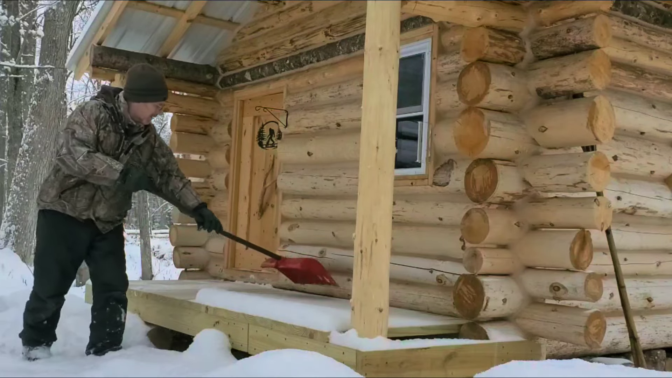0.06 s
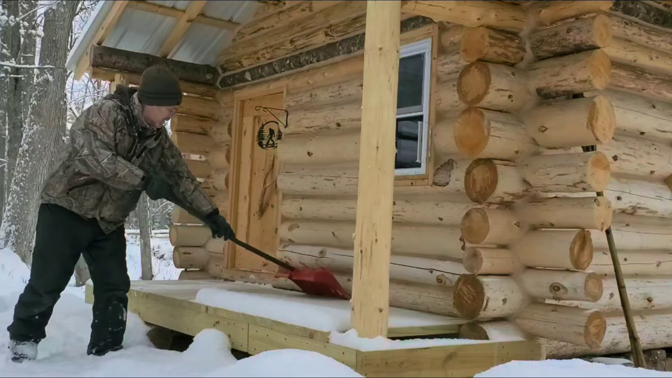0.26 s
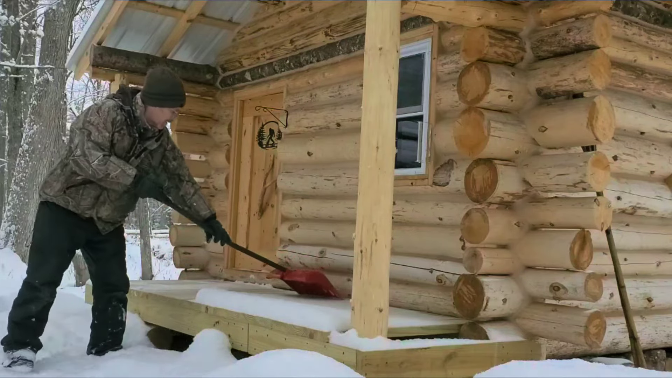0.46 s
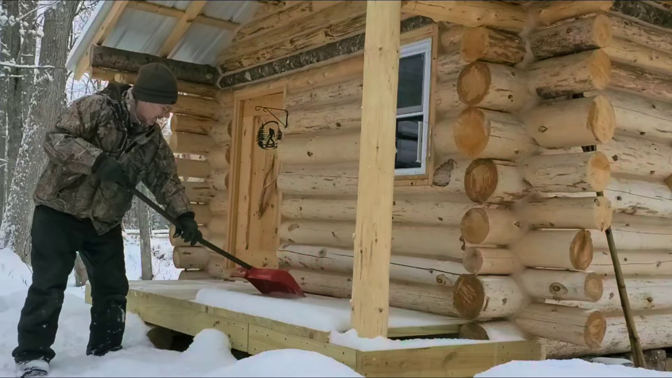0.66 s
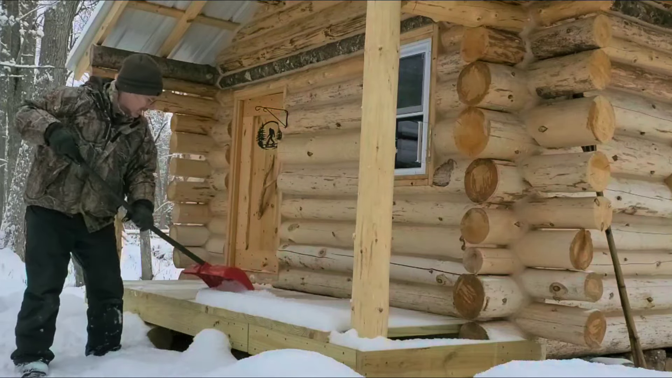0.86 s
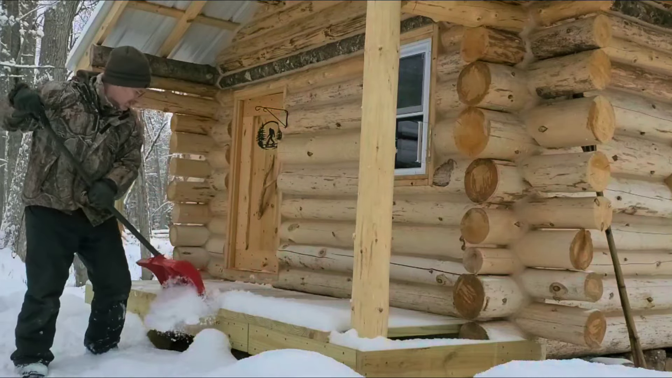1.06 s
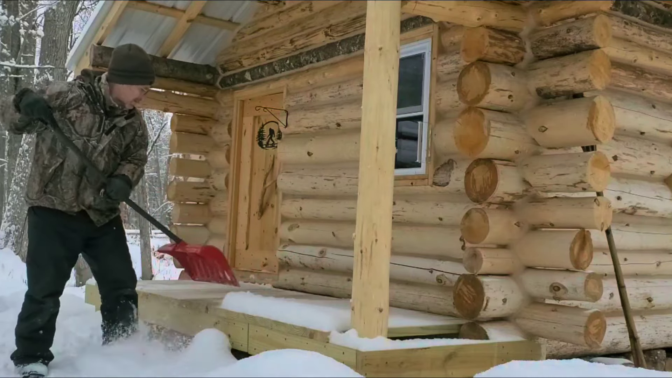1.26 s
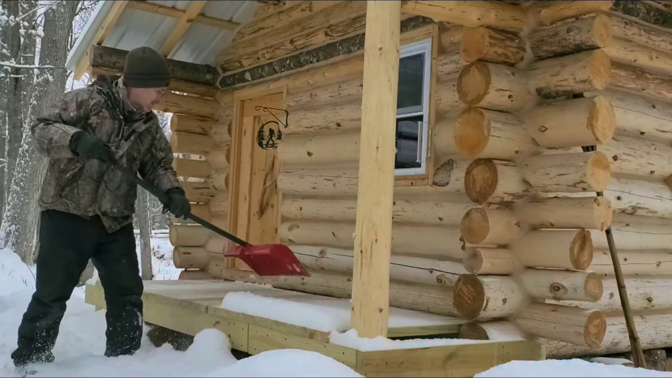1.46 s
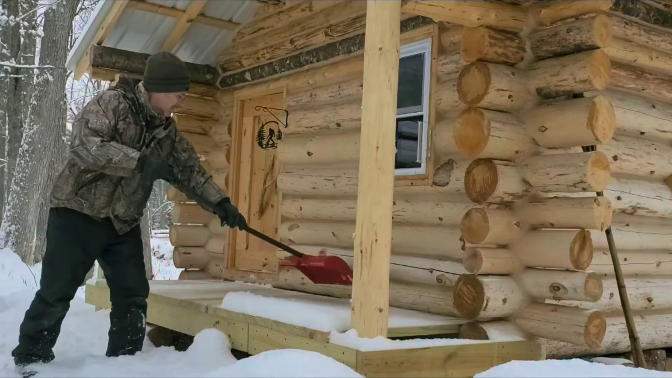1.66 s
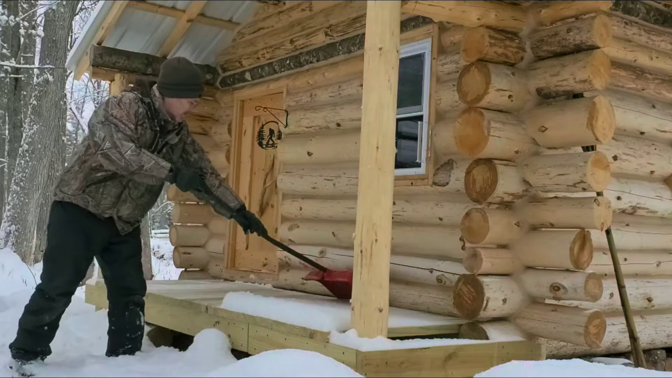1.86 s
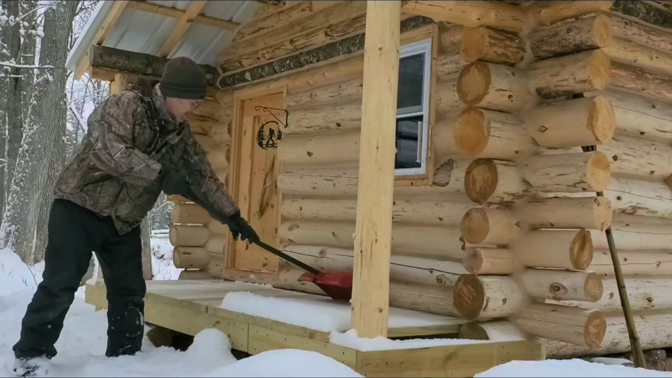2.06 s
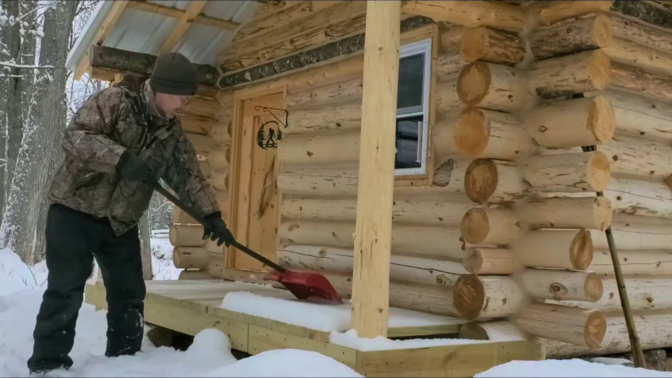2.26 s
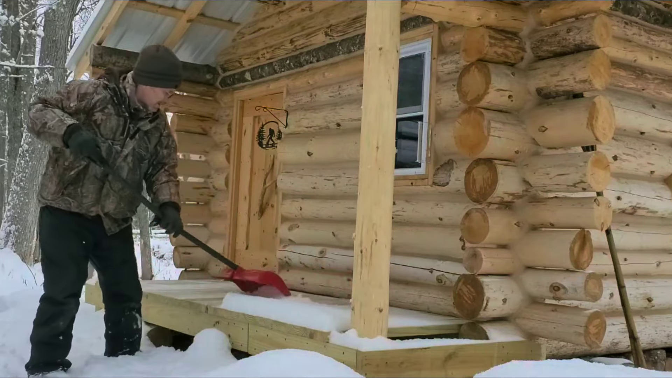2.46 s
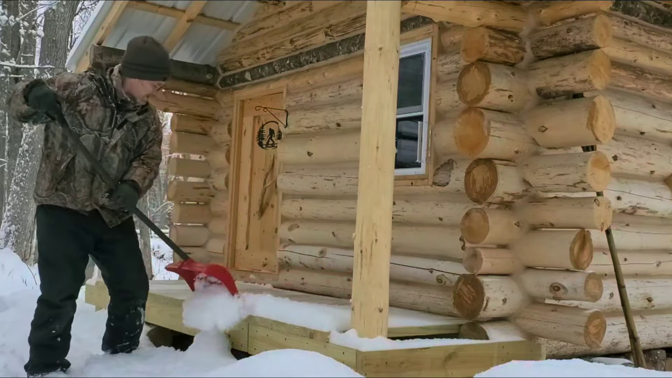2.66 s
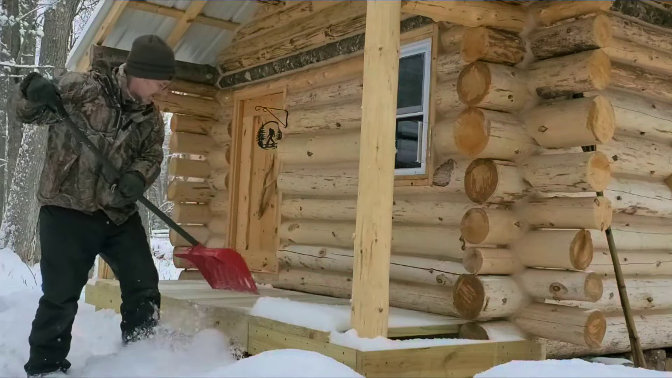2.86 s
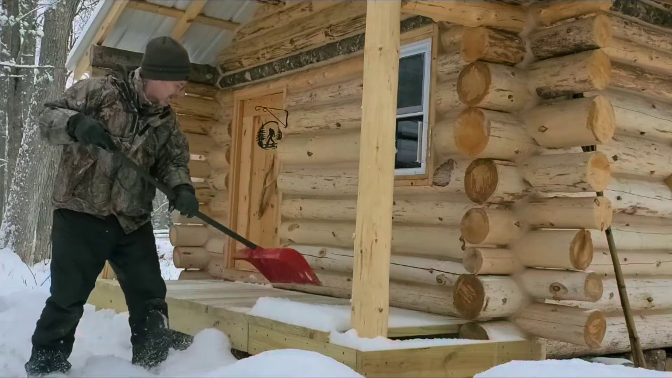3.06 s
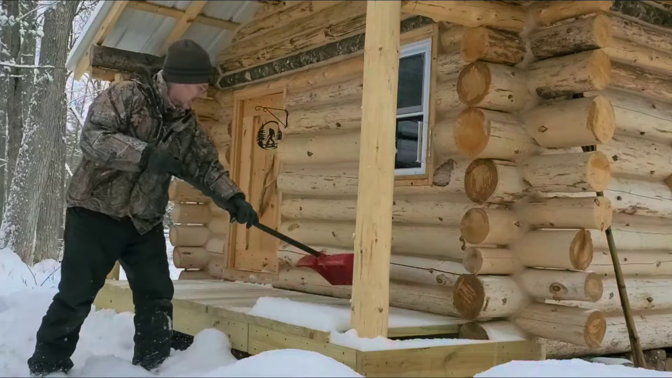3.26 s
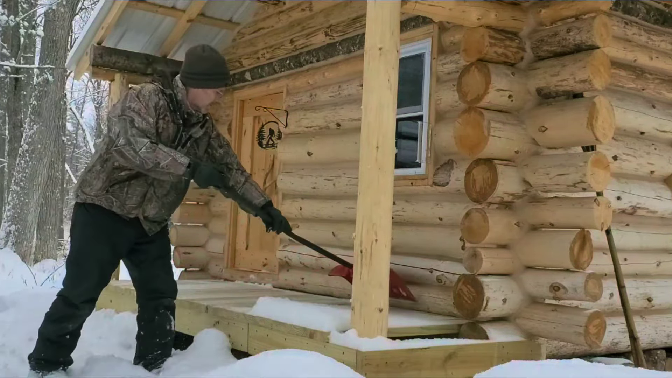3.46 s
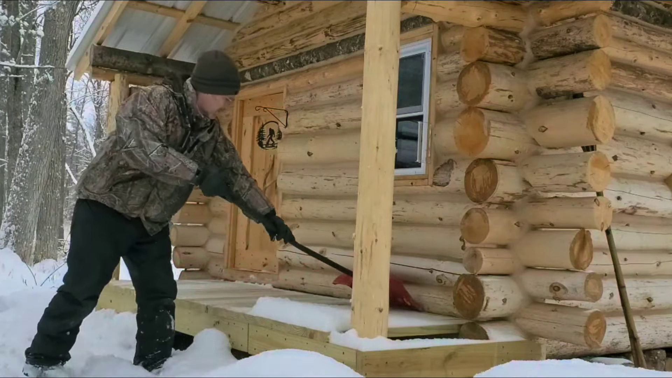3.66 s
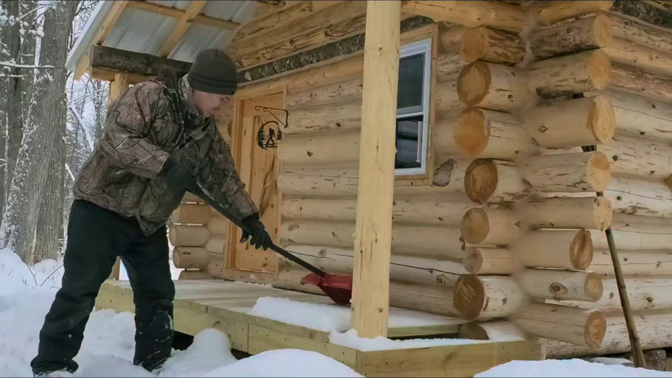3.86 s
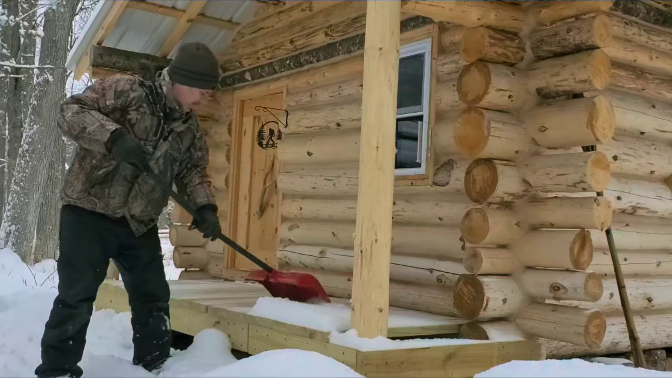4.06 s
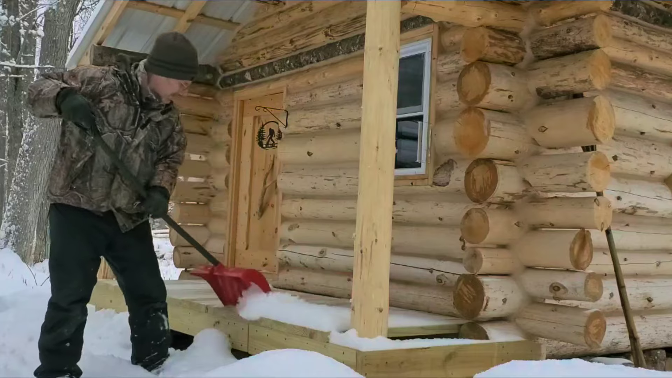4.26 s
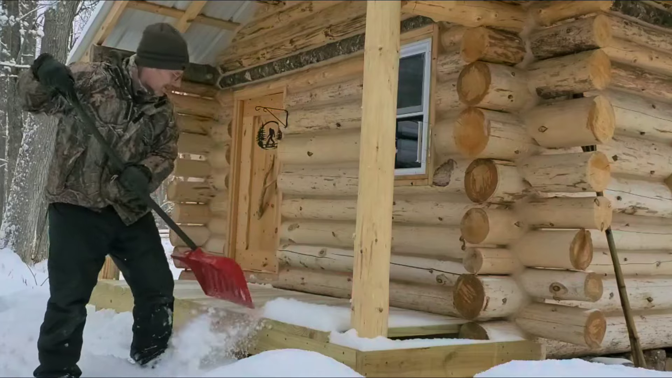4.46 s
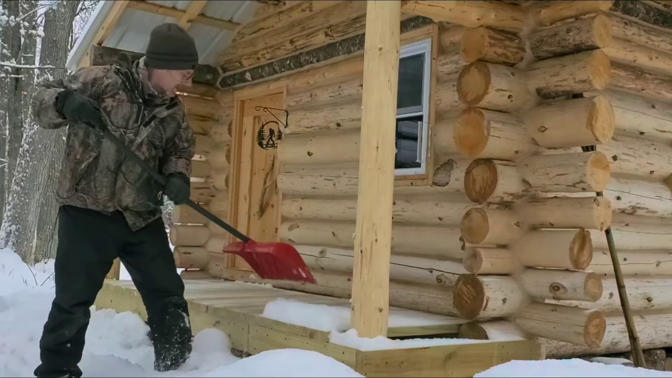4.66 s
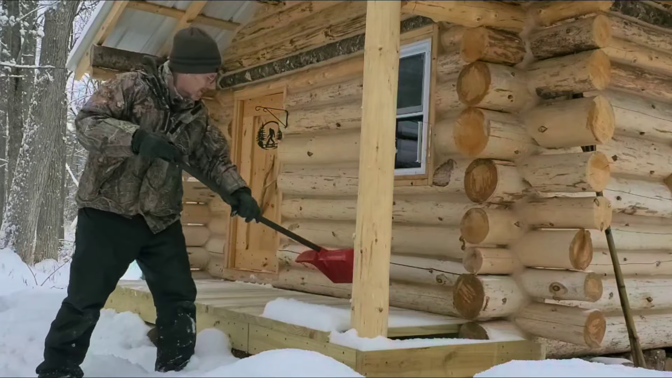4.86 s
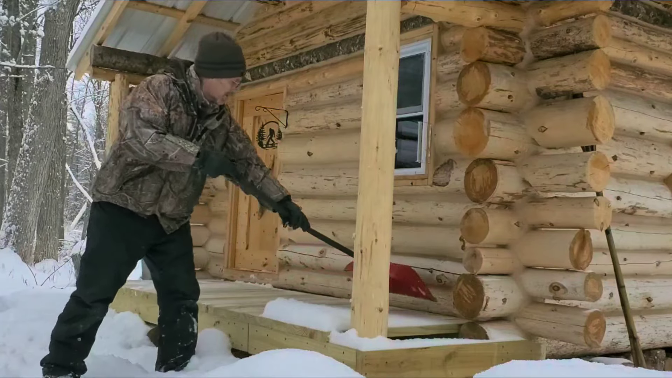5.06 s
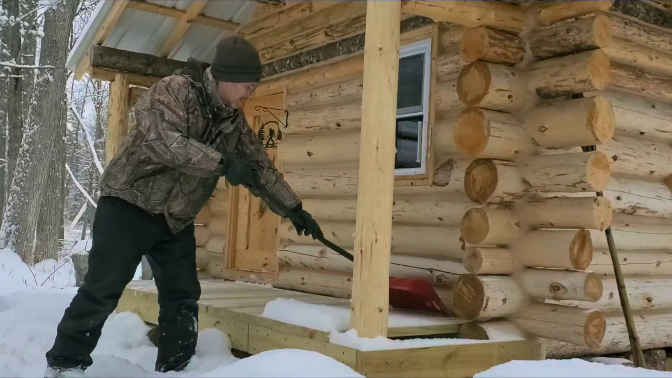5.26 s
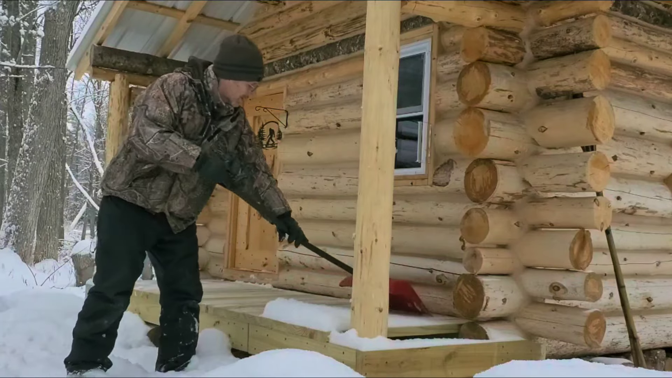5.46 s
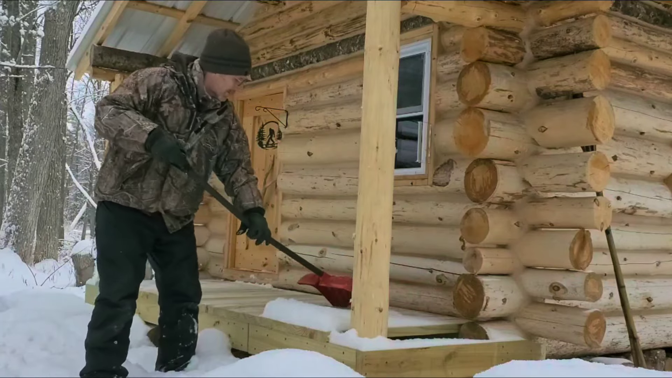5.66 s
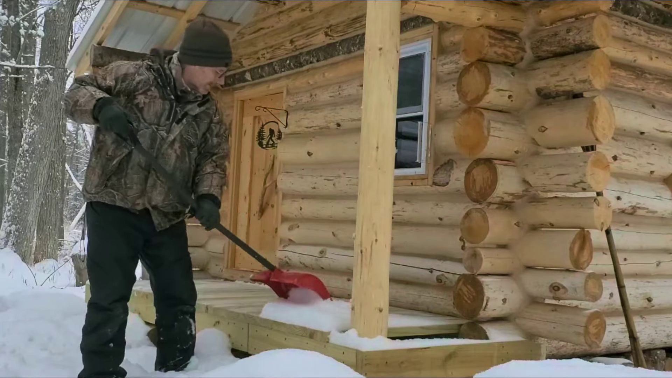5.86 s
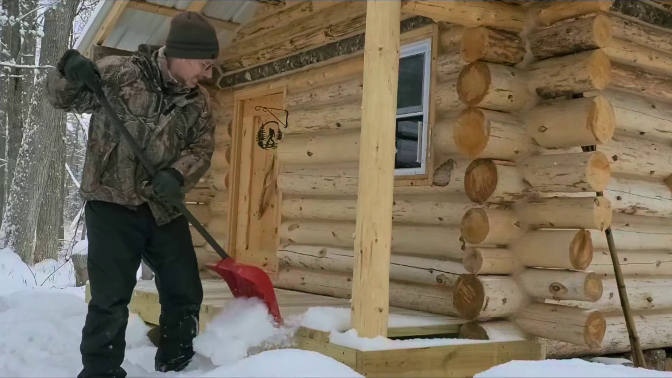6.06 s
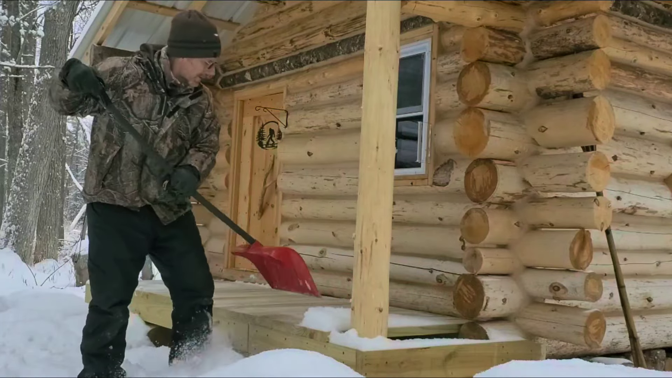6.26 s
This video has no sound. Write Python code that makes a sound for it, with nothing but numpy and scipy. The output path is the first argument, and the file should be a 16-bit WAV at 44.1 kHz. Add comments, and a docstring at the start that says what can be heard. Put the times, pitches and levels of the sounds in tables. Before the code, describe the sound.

Outdoors by a log cabin, a plastic snow shovel is dropped on a wooden deck and dragged to its edge four times. Each pull opens with a woody knock, continues as a rough hollow scrape with crisp snow crunch, and ends with a clack off the last board. Loose snow patters softly between strokes. A faint low rumble and uneven engine-like drone continue far off. Close stereo microphone, scrapes leaning left, with short dull echoes.

```python
"""Plastic shovel on a snowy deck

A plastic shovel is dropped on a snowy wooden deck and pulled to its edge, four times. Each time the
blade lands, scrapes, crushes snow and knocks off the last board; loose snow then patters down.
Filtered noise makes the scrape, crushing and patter; swelling sines make the boards ring.
Short echoes follow. Far off go a low rumble, slightly louder while the blade drags, and an uneven drone."""
import sys
import numpy as np
from scipy import signal
from scipy.fft import rfft, irfft
from scipy.io import wavfile
from scipy.ndimage import uniform_filter1d

SR = 44100
rng = np.random.default_rng(int(sys.argv[2]) if len(sys.argv) > 2 else 0)


def pcm_store(signal):
    """Save signal as 16-bit PCM."""
    levels = np.round(np.clip(np.atleast_2d(signal), -1, 1) * 32767)
    wavfile.write(sys.argv[1], SR, levels.astype(np.int16).T)


N = 277830

# How hard the blade presses in each pull, one list a pull, on a relative scale:
# time_s, pressure_db, hiss_db (snow hiss compared with the pressure)
STROKES = [
    [(0.578, -55, -19), (0.64, -35.5, -6.5), (0.72, -38, -2.5), (0.86, -33, -4.5), (0.984, -34, -8.5),
     (1.134, -38, -9.5), (1.236, -32, -12), (1.276, -54.5, -27)],
    [(2.162, -45, -22), (2.24, -40, -7), (2.262, -30.5, -14.5), (2.316, -37.5, -2), (2.59, -34.5, -4),
     (2.73, -38, -3), (2.81, -36.5, -7.5), (2.876, -28, -27), (2.93, -81.5, -30)],
    [(3.86, -43.5, -28), (3.902, -41, -23), (3.972, -35.5, -2), (4.054, -36.5, -0.7), (4.186, -34, 2),
     (4.326, -32.5, -4.5), (4.458, -34.5, -10), (4.53, -29, -11.5), (4.6, -43, -14)],
    [(5.5, -44.5, -45), (5.544, -37.5, -9.5), (5.728, -30, -5.5), (5.8, -36.5, -3.5), (5.978, -32, -4.5),
     (6.124, -44, -4), (6.212, -32, -13), (6.24, -23.5, -22.5), (6.29, -52, -4)],
]


def shovel():
    """Pressing and knocking shake blade and deck, break snow crystals and make the edge chatter."""
    pressure = played(STROKES, 1, -120.)
    force = contact_force(pressure)
    solid = scrape(force) + blade_rings(force) + edge_chatter(pressure)
    near = patchy(solid, 2.24, 25., 180.) + patchy(crushed_snow(pressure), 2.1, 30., 600.)
    deck = deck_boom(pressure) + board_drone(pressure)
    return at_ports(near, SAME, 0.43) + at_ports(deck, SAME, 0.86) + boards()


def contact_force(pressure):
    """Gritty rubbing with sharp snaps, plus knocks and brief accents."""
    rubbing = faded(pressure) * grit(1.0, 2.2, 160.0, 16.3)
    return rubbing + blows(column=1, rise_ms=0.92, t60_share=0.62) * grit(4.7, 2.2)


# Knocks of blade on wood and brief accents within the scraping; levels are relative:
# start_s, force_db, crack_db and boom_db (compared with force),
# fall_s (time to fall 60 dB, before each layer's share),
# place (on a scale where the boards are 0 to 3), ring_db (board ring compared with force)
BLOWS = [(0.455, -25, -6, -4.5, 0.2, 1.66, -2), (0.467, -35, -36, -22, 0.31, 1.93, 10.5),
         (0.655, -33, -17, -21, 0.22, 1.45, 6.5), (0.971, -29, -21, -11, 0.28, 0.99, 0),
         (1.229, -26.5, -12.5, -4.5, 0.17, 2.8, 0.5), (2.034, -27, -16, -8, 0.23, 1.48, 5),
         (2.087, -11, -21, -18, 0.09, 2.1, -16), (2.102, -26.5, -26, -30, 0.18, 2.2, 4),
         (2.138, -35.5, -10, -22, 0.096, 0.33, -1), (2.165, -35, -9.5, -8, 0.18, 1.6, 0.5),
         (2.246, -23.5, -30, -32.5, 0.27, 2, -7.5), (2.644, -31, -38, -22, 0.085, .6, 4),
         (2.856, -31.5, -4, -7, 0.11, .3, -3), (3.781, -21, -23, -31.5, 0.087, 2.9, -21),
         (3.787, -14, -18.5, -35, 0.046, 2.2, -10), (3.791, -15, -24.5, -17.5, 0.24, 2.9, -17),
         (3.833, -24, -32, -21, 0.052, 1.2, 4), (4.495, -20.5, -13, -7, 0.059, 0.055, -12),
         (4.516, -23, -31, -32, 0.066, .1, -13), (4.54, -13, -18, -37, 0.09, 0.045, -19),
         (5.436, -26, -20, -13, 0.31, .1, -1), (5.457, -15.5, -27, -23, 0.13, 2.56, 0.5),
         (5.482, -27, -28, -28, 0.074, 1.3, 6), (5.583, -22.5, -30, -13, 0.071, 1.4, -5),
         (5.704, -7, -42, -35, 0.026, 3.6, -20), (5.895, -19, -12.5, -41, 0.1, 5.1, -15),
         (5.965, -36.5, -28, -35, 0.25, 0.08, -5), (6.172, -36, -2.5, -12, 0.16, 1.1, 4),
         (6.226, -10, -25, -11.5, 0.08, 0.055, -16.5)]


def blows(column, rise_ms, t60_share):
    """Envelope of all knocks and accents: a quick rise, then a fall."""
    out = np.zeros(N)
    for row in BLOWS:
        start = round(row[0] * SR)
        t = np.arange(min(SR // 2, N - start)) / SR
        extra_db = row[column] if column > 1 else 0
        db = row[1] + extra_db - 60 * t / (row[4] * t60_share)
        out[start:][:len(t)] += amp(db) * (1 - np.exp(-1000 * t / rise_ms))
    return out


# Colour of the broad scrape: pitch_hz, level_db (per Hz, relative)
BODY = [(110, -35), (180, -1), (251, -2), (337, 3.5), (518, -9.5), (629, -1), (703, -3), (1890, -8.5),
        (2830, -14.5), (5000, -24.5), (6500, -31), (11000, -120)]


def scrape(force):
    """Broad noise of the blade dragging over wood."""
    return amp(-5.5) * coloured(force, BODY)


# Pitches at which blade and boards ring together: pitch_hz, width_hz, level_db (relative)
RINGS = [(187.5, 35, -1.5), (341, 18, 2), (439, 17, 0.5), (549, 39, 0.3), (605, 24, -5.5), (920, 110, -29),
         (1045, 140, -10.5), (1298, 630, -4.5), (1500, 780, -28), (1967, 46, -37), (2306, 79, -6.5),
         (2460, 50, -10)]


def blade_rings(force):
    """Blade and boards resonate together under the force."""
    # each ring takes up the force unevenly as the blade tilts and crosses boards
    drift = uniform_filter1d(rng.standard_normal((len(RINGS), N // 64 + 1)), 35, 1)
    steps = np.clip(drift / drift.std(), -3, 1.4)
    taken = amp(5.1 * np.repeat(steps, 64, 1)[:, :N])
    rings = 0
    for k, ((hz, width, db), take) in enumerate(zip(RINGS, taken)):
        rings = rings + (-1) ** k * amp(db) * resonate(force * take, hz, width)
    return amp(-19.0) * rings


KNOCK_CHATTER_DB = -19.5  # a knock or accent also sets the edge chattering
CHATTER_WANDER = .05  # share by which the chatter pitch strays as the edge catches (standard deviation)


def edge_chatter(pressure):
    """The blade's edge catches and chatters, heard as noise around a wandering pitch."""
    edge = faded(pressure + pulled(column=2) + bite(column=0)) * grit(2.2, 26.0, 120., 16.0)
    knocks = blows(column=1, rise_ms=4.5, t60_share=0.61) * grit(1.4, 2.7)
    edge = edge + amp(KNOCK_CHATTER_DB) * knocks
    stray = uniform_filter1d(uniform_filter1d(rng.standard_normal(N), 1800), 1800)
    pitch = uniform_filter1d(pulled(column=1) * bite(column=1), 400)
    pitch = pitch * (1 + CHATTER_WANDER * stray / stray.std())
    return resonate(resonate(edge, pitch, 650), pitch, 1300)


# What every pull shares on its way from wall to edge; levels are compared with the pressure:
# share (of the pull, 0-1), chatter_hz (before bite and straying), chatter_db,
# boom_db (hollow deck), drone_db (deepest board)
PULL = [(0, 1600, -34.5, -13.5, -0.5), (.2, 1750, -19.5, -16, -19.5), (.45, 1990, -17.5, -16, -10.5),
        (0.801, 1670, -13.5, -13, -27), (.93, 1480, -19.5, -6.5, -5), (1, 1480, -43, -20, -8.5)]


def pulled(column):
    """One column of PULL laid along every stroke."""
    t, rows = np.arange(N) / SR, np.array(PULL)
    share = 0
    for stroke in STROKES:
        begin, end = stroke[0][0], stroke[-1][0]
        share = share + np.clip((t - begin) / (end - begin), 0, 1) * (t <= end)
    return np.interp(share, rows[:, 0], rows[:, column])


# How the edge bites, one row a stroke: chatter_db (added), pitch_ratio
BITE = [(1, 1.023), (1.9, 0.94), (4, 1.044), (2.6, 1.03)]


def bite(column):
    """One column of BITE held from each stroke's end to the next one's."""
    ends = [stroke[-1][0] for stroke in STROKES[:-1]]
    return np.array(BITE)[np.searchsorted(ends, np.arange(N) / SR), column]


# Colour of breaking snow crystals: pitch_hz, level_db (per Hz, relative)
HISS = [(1470, -19), (2500, -3), (4030, -7.5), (6620, -10), (7560, -17), (8710, -9), (10500, -8.5),
        (13700, -2.5), (14600, -8.5), (15800, -4), (16300, -46)]


def crushed_snow(pressure):
    """Breaking crystals make a bright, snapping hiss."""
    crystals = faded(pressure + played(STROKES, 2))
    crystals = crystals + blows(column=2, rise_ms=0.46, t60_share=0.7)
    return coloured(crystals * grit(1.6, 0.46, 400., 3.1), HISS)


# Colour of the hollow deck: pitch_hz, level_db (per Hz, relative)
BOOM = [(40, -20.5), (60, 0.5), (100, 10.5), (130, -2), (170, 9.5), (230, 3), (320, -34)]


def deck_boom(pressure):
    """The hollow deck booms under pressure, knocks and accents."""
    push = faded(pressure + pulled(column=3)) + blows(column=3, rise_ms=11.0, t60_share=1.09)
    return amp(-0.5) * coloured(push * grit(0.41, 16.0), BOOM)


def board_drone(pressure):
    """Dragging keeps the deepest board humming."""
    return resonate(faded(pressure + pulled(column=4)) * grit(3.3, 30.), BOARDS[0][0], 20.6)


# Free rings of the boards, side by side:
# pitch_hz (centre), t60_s (time to fall 60 dB, smothering aside), smother_s (until snow smothers it)
BOARDS = [(334, 0.4, 0.074), (414, 0.37, 0.025), (547.4, 0.29, 0.056), (626.6, 0.16, 0.12)]
RING_FALL_DB = 12.5  # a board one place further away rings this much less


def boards():
    """At each knock or accent the boards swell up and ring freely; its place decides which ones."""
    out, clock = np.zeros(N), np.arange(N) / SR
    for k, ((hz, t60, smother), phase) in enumerate(zip(BOARDS, rng.random(len(BOARDS)))):
        swing = np.zeros(N)  # power: a board already ringing is pushed further
        for row in BLOWS:
            start = round(row[0] * SR)
            t = clock[:min(SR // 3, N - start)]
            db = row[1] + row[6] - RING_FALL_DB * abs(k - row[5])
            db = db - 60 * t / t60 - 20 * np.minimum(t / smother, 1.2) ** 3
            swing[start:][:len(t)] += (amp(db) * (1 - np.exp(-t / 0.016)) ** 2) ** 2
        waver = uniform_filter1d(rng.standard_normal(N), 1500)
        turns = np.cumsum(hz + 7.7 * waver / waver.std()) / SR + phase
        out += np.sqrt(swing) * np.sin(2 * np.pi * turns)
    return out * amp([[9.5], [4.5]])  # left, right


# Thinning of the echoed sound, which carries little bass: pitch_hz, level_db (per Hz, relative)
THIN = [(100, -11.5), (400, -6.5), (1000, 1.4), (16000, 4)]


def yard(x):
    """Wall and roof return a short tail of sparse echoes, dull at its end."""
    taps = np.zeros((2, SR // 2))
    # one click at a random spot in every 20 samples
    slots = np.arange(300, SR // 2 - 20, 20)
    at = slots + rng.integers(0, 20, (2, (SR // 2 - 301) // 20))
    np.put_along_axis(taps, at, rng.choice([-1., 1.], at.shape), 1)
    hz, t, z = signal.stft(taps, SR, nperseg=256)
    # pitch in Hz, seconds to fall 60 dB
    t60 = read([(200, 0.28), (1000, 0.17), (5000, 0.017), (15000, 0.042)], hz)
    tail = signal.istft(z * amp(-60 * t / t60[:, None]), SR, nperseg=256)[1]
    return signal.fftconvolve(coloured(x, THIN), tail / np.linalg.norm(tail[0]), axes=1)[:, :N]


# Lumps of snow bursting with a bright tick: start_s, level_db (relative)
LUMPS = [(1.33, -52), (1.3748, -54), (1.401, -52.5), (3.0155, -55), (3.9114, -52), (3.938, -32),
         (3.97, -31), (4.601, -54), (4.634, -49), (4.678, -50), (4.955, -65)]
# Loose snow coming down and clothes rustling:
# start_s, rise_s, hold_s, hiss_db (relative), t60_s (time to fall 60 dB),
# patter_db (softer patter compared with the hiss)
SHOWERS = [(0.0, 0.028, .06, -75.5, 0.98, -1), (0.32, 0.026, 0.03, -76, 0.29, -6),
           (1.258, 0.0098, 0.018, -62, 0.84, 4.5), (1.364, 0.012, 0.041, -60.5, 0.29, -6.5),
           (1.5, .05, .1, -88, 1, -10), (1.85, .05, .05, -77.5, .9, -2.5),
           (1.95, 0.034, 0.017, -72.5, .6, -2.5), (2.885, .011, 0.0097, -57, 0.35, 3),
           (3.007, 0.017, 0.036, -60, 0.11, -7), (3.074, .015, .03, -71, .8, 3),
           (3.38, 0.084, 0.025, -70.5, 1, -2), (4.574, 0.0085, 0.013, -60, 0.98, 8),
           (4.669, 0.017, 0.024, -64, 0.21, -10.5), (4.953, .011, 0.0083, -79.5, 0.14, -3),
           (5.13, 0.045, 0.18, -74, .4, -8.5)]
# Colour of the softer patter: pitch_hz, level_db (per Hz, relative)
PATTER = [(180, -38), (300, 6.5), (329, 6), (496, -4.5), (1270, -4.5), (1600, -0.5), (1740, -3.5),
          (3500, -37.5), (4550, -61), (7700, -120)]


def snowfall():
    """Soft hiss and patter of loose snow and rustling clothes, and lumps that burst."""
    bursts, t = np.zeros(N), np.arange(2000) / SR
    for s, db in LUMPS:
        bursts[round(s * SR):][:len(t)] += amp(db - 60 * t / 0.0096)
    fine, soft = np.zeros((2, N))
    for s, rise, hold, db, t60, patter_db in SHOWERS:
        start = round(s * SR)
        since = np.arange(min(SR, N - start)) / SR
        falling = np.maximum(since - rise - hold, 0)
        shower = np.minimum(since / rise, 1) ** 2 * amp(db - 60 * falling / t60)
        fine[start:][:SR] += shower
        soft[start:][:SR] += amp(patter_db) * shower
    hiss = coloured((fine + bursts) * grit(1.5, 4.6, 240.0, 12.0), HISS)
    patter = coloured(soft * grit(1.4, 6.9), PATTER)
    return at_ports(hiss + patter, SAME_FAR, 0.13)


# Colour of the rumble with faint air hiss: pitch_hz, level_db (per Hz, relative)
RUMBLE = [(20, -27.5), (40, 0), (69, -1.5), (108, -8), (135, -11.5), (223, -26), (340, -31), (600, -42.5),
          (1500, -38), (2500, -40.5), (3000, -63), (5780, -60), (6650, -50), (7440, -64.5), (14200, -47),
          (16300, -46.5)]
# Swellings in that colour: pitch_hz, width_hz, level_db (on the same scale)
HUMS = [(61.5, 8, -12.5), (81.5, 5.8, 0.5), (96, 8.1, 4.5)]
RUMBLE_DB, SHAKEN_DB = -50, 1.5  # level before the ports, and its swell while the blade drags


def rumble():
    """Low noise, slightly louder while the blade drags, with a few swellings in its colour."""
    hz = np.fft.rfftfreq(N, 1 / SR)
    swell = sum(amp(2 * db) / (1 + (2 * (hz - f) / w) ** 4) for f, w, db in HUMS)
    shape = np.sqrt(amp(2 * read(RUMBLE, hz)) + swell)
    x = irfft(rfft(grit(1.4, 99.0)) * shape, N)
    dragging = uniform_filter1d(1. * (played(STROKES, 0, -1.) > 0), SR // 10)
    return at_ports(x / x.std() * amp(RUMBLE_DB + SHAKEN_DB * dragging), SAME_FAR, 0.77)


# One chance course of a low drone's uneven level, with dips near 0.46 and 3.33 s:
# time_s, level_db (rms, before wavering and left-right balance)
HUM = [(0.0, -49.5), (0.46, -63), (0.86, -46), (2.07, -52.5), (2.16, -47), (3.33, -55.5), (3.42, -48),
       (5.11, -51), (5.23, -49.5), (6.3, -43.5)]
HUM_HZ, HUM_WAVER_DB = 49.8, 3.5  # centre pitch; standard deviation of the added level waver


def low_drone():
    """A low engine-like sine of uneven level; pitch and level also waver at random."""
    wobble = uniform_filter1d(rng.standard_normal(N), SR // 4)
    waver = uniform_filter1d(uniform_filter1d(rng.standard_normal(N), 2500), 2500)
    turns = np.cumsum(HUM_HZ + 0.73 * wobble / wobble.std()) / SR
    level = played([HUM], 1) + HUM_WAVER_DB * waver / waver.std()
    return np.sqrt(2) * amp(level) * np.sin(2 * np.pi * turns) * amp([[1.3], [-1.3]])


# Left-right likeness of near sounds, then of far ones: pitch_hz, likeness (1 is identical)
SAME = [(60, 0.98), (300, 0.97), (950, 0.98), (2400, 0.62), (5000, 0.13), (9000, .4), (15000, 0.39)]
SAME_FAR = [(60, 1), (240, 0.74), (950, 0.053), (3770, 0.027), (15000, 0.02)]
# How far the microphone ports favour the left: pitch_hz, lead_db (before each sound's lean)
LEAN = [(60, -1.5), (140, 3.5), (330, 6.5), (770, 12), (1170, 18), (1790, 19.5), (2740, 7.5), (4190, 21.5),
        (6410, 30), (8000, 13.5), (9810, 9), (12500, 10.5), (14200, 36.5), (15500, 15.5)]
# How far the left leads in phase: pitch_hz, lead_rad
TURN = [(100, 0), (700, .2), (1290, .4), (1810, -.5), (2500, -.5), (3700, 1.6), (6800, .8), (10900, 1.8),
        (16000, 1.1)]


def at_ports(x, same, lean):
    """The right port hears the left stream in part, the rest comes by other paths."""
    hz, (a, b) = np.fft.rfftfreq(N, 1 / SR), rfft(x)
    likeness = np.clip(read(same, hz), -1, 1)
    tilt = amp(lean * read(LEAN, hz) / 2)
    late = np.exp(-1j * read(TURN, hz))
    right = likeness * a * late + np.sqrt(1 - likeness * likeness) * b
    return irfft(np.array([a * tilt, right / tilt]), N)


def patchy(x, depth_db, ms, width_hz):
    """Random patches in time and pitch: the contact with snow and wood keeps shifting."""
    hz, t, z = signal.stft(x, SR, nperseg=512, noverlap=384)
    field = rng.standard_normal(z.shape[1:])
    for _ in range(2):
        field = uniform_filter1d(field, max(round(ms * SR / 128000), 1), 1)
        field = uniform_filter1d(field, max(round(width_hz / hz[1]), 1), 0)
    gain = amp(depth_db * field / field.std())
    gain = gain / np.sqrt(np.mean(gain ** 2))
    return signal.istft(z * gain, SR, nperseg=512, noverlap=384)[1][:, :N]


def grit(spread_db, ms, snaps_per_s=0, snap_db=0):
    """Two streams of noise in clumps of uneven size, with single sharp snaps on top."""
    clumps = uniform_filter1d(rng.standard_normal(N), max(round(ms * SR / 1000), 1))
    x = rng.standard_normal((2, N)) * amp(spread_db * clumps / clumps.std())
    chance, size = rng.random(N), rng.standard_normal((2, N))
    x = x + (chance < snaps_per_s / SR) * amp(snap_db) * size
    return x / x.std()


def resonate(x, hz, width):
    """Rings at hz: shifts that pitch to zero, smooths, shifts back; white noise keeps its power."""
    r = np.exp(-np.pi * width / SR)
    gain = np.sqrt(2 * (1 - r * r))
    if np.ndim(hz) == 0:  # a fixed pitch needs one pole only
        return gain * signal.lfilter([1], [1, -r * np.exp(2j * np.pi * hz / SR)], x).real
    turn = np.exp(2j * np.pi * np.cumsum(hz) / SR)
    return gain * (turn * signal.lfilter([1], [1, -r], x / turn)).real


def coloured(x, points):
    """Causal filter of the given spectrum; white noise keeps its power."""
    log_gain = np.log(amp(read(points, abs(np.fft.fftfreq(8192, 1 / SR)))))
    # minimum phase: the filter responds as early as its spectrum allows
    taps = np.fft.ifft(np.exp(np.conj(signal.hilbert(log_gain)))).real[:4096]
    return signal.oaconvolve(x, taps[None] / np.linalg.norm(taps), axes=1)[:, :N]


def played(tables, column, quiet=None):
    """Joins one column of the tables over time; quiet fills the time outside the tables."""
    t = np.arange(N) / SR
    rows = np.concatenate(tables)
    line = np.interp(t, rows[:, 0], rows[:, column])
    if quiet is None:
        return line
    inside = sum((t >= table[0][0]) & (t <= table[-1][0]) for table in tables) > 0
    return np.where(inside, line, quiet)


def faded(db, size=400):
    """Gain whose steps are rounded over a few milliseconds (size in samples)."""
    return uniform_filter1d(amp(db), size)


def read(points, hz):
    """Table value on a log-frequency axis."""
    f, value = np.transpose(points)
    return np.interp(np.log(hz + 1), np.log(f + 1), value)


def amp(db):
    """Turns decibels into a gain."""
    return 10 ** (np.asarray(db) / 20)


def scene():
    """Shovel with its echoes, falling snow, rumble and low drone."""
    near = shovel()
    return near + amp(-10.5) * yard(near) + snowfall() + rumble() + low_drone()


LOW_CUT_HZ, EDGE_HZ = 33, 16250  # lower and upper limits of the sound


def record(dry):
    """Low cut of the microphone, then a steep upper band limit."""
    cut = signal.sosfilt(signal.butter(4, LOW_CUT_HZ, "high", fs=SR, output="sos"), dry)
    band_limit = signal.firwin(511, EDGE_HZ, window=("kaiser", 9), fs=SR)
    return signal.oaconvolve(cut, band_limit[None], "same")


dry = scene()
out = record(dry)
pcm_store(out)
```